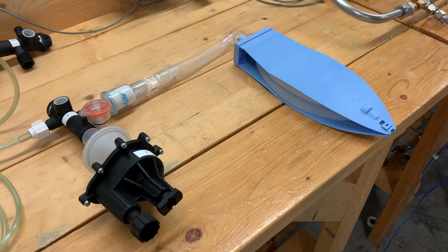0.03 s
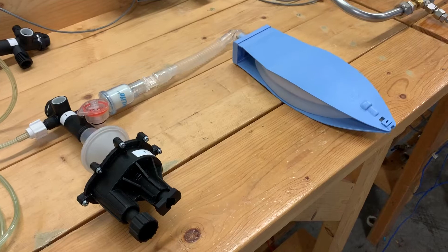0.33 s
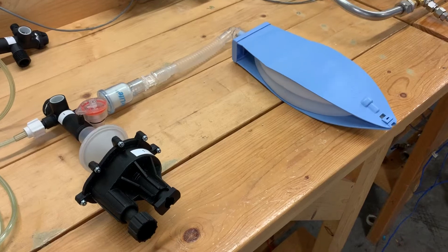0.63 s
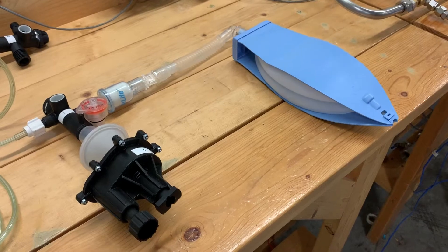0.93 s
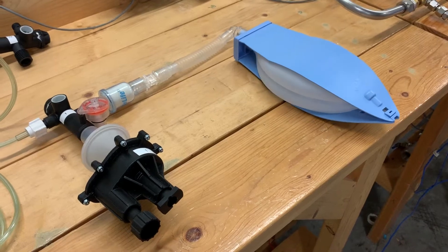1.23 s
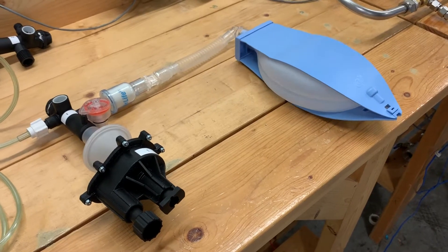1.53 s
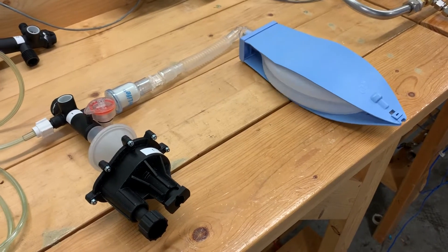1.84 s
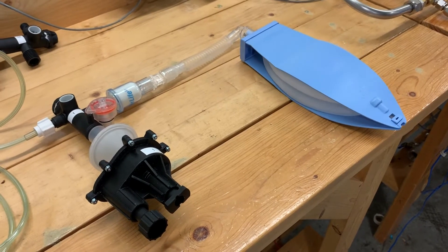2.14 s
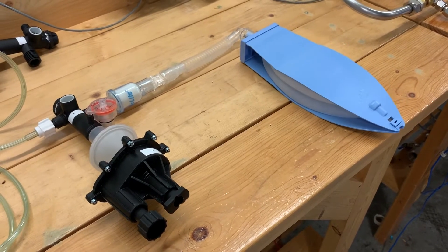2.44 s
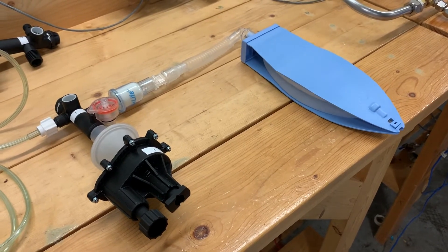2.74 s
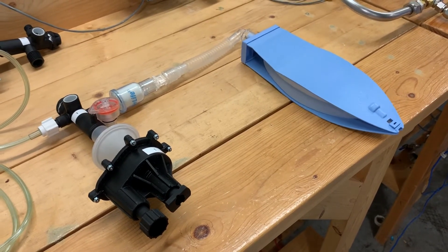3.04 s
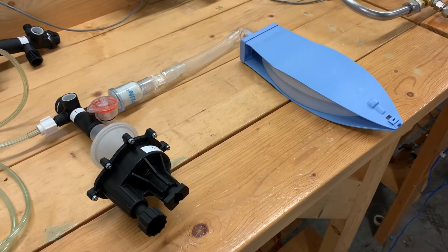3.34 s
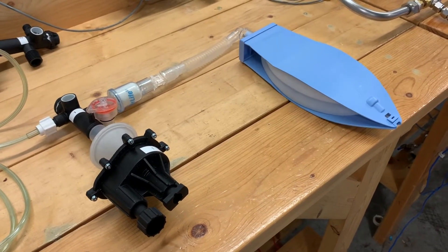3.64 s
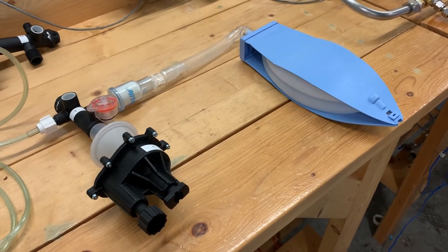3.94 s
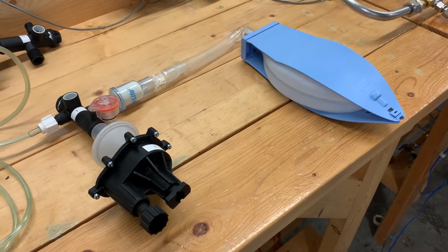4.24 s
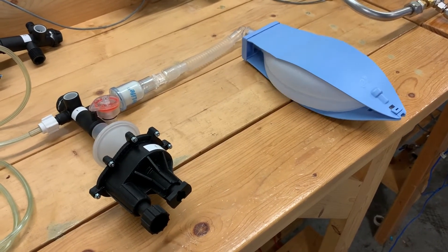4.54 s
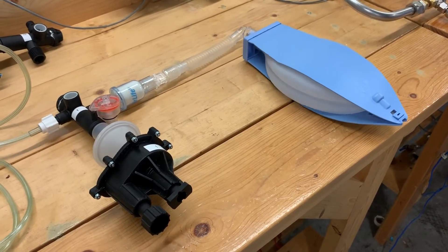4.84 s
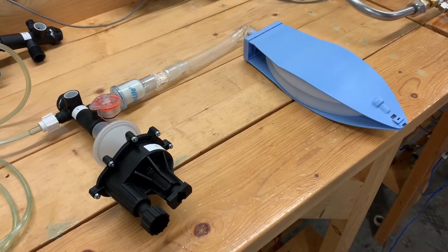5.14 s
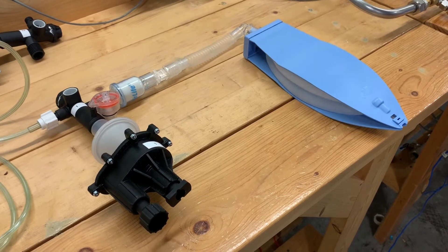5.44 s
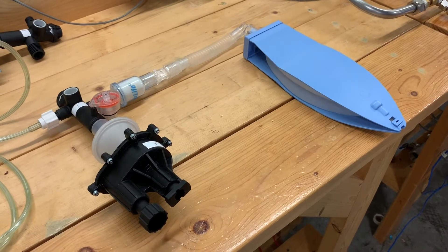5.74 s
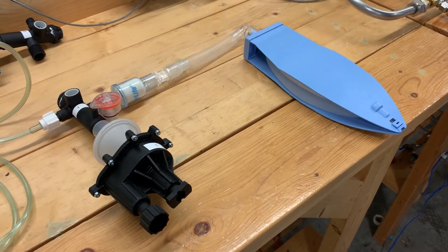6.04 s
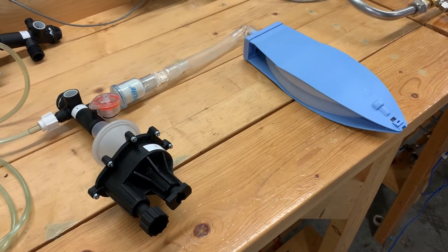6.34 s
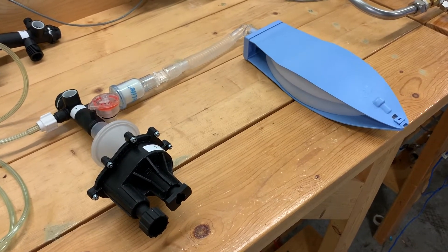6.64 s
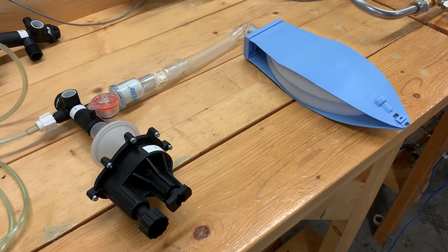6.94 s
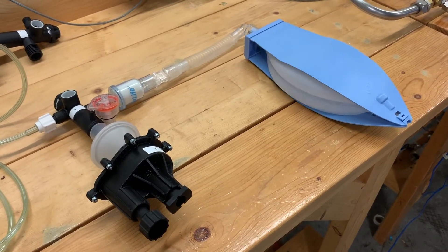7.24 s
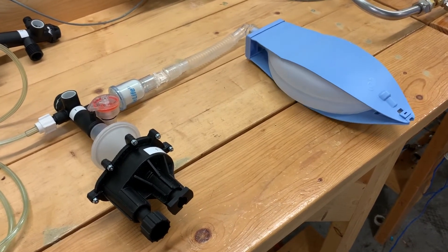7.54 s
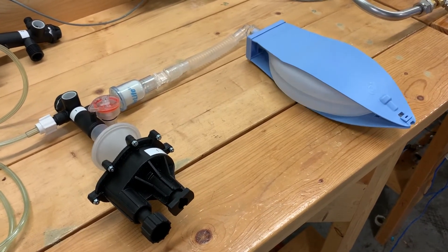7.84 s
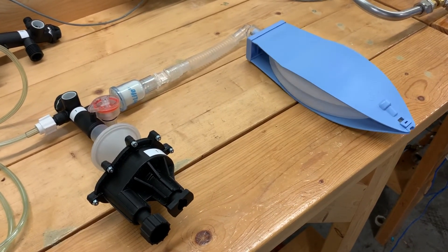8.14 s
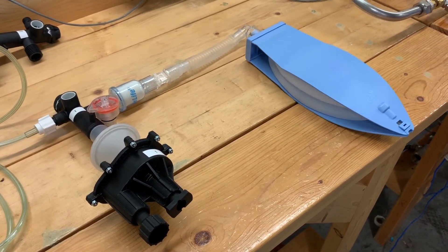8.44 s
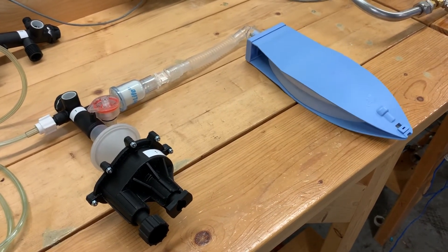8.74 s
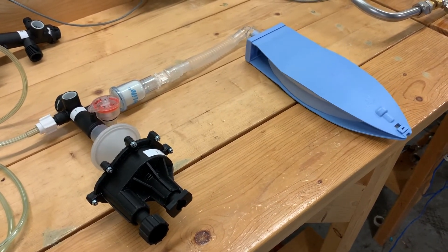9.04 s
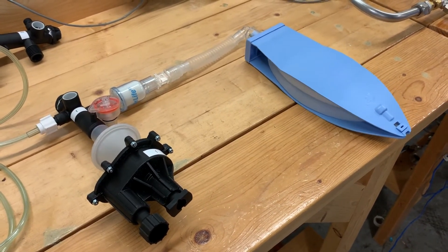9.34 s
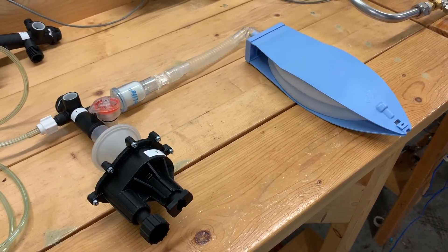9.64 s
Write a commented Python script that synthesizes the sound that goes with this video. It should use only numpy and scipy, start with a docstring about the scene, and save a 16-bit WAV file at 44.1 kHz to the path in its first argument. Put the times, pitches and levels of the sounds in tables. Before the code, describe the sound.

Close up, a bright, constant hiss of gas comes from a ventilator as it inflates and empties a test bag three times. Each cycle starts with a faint filling whistle, followed by a sudden gush of air that sags away into a brief high squeal, a lower chirp and a soft puff as the valve closes. Small clicks are scattered throughout, over the quiet hum and rumble of a workshop.

```python
"""A gas-driven ventilator hisses steadily from its supply jet and cycles a test lung about every 3 s.
The bag fills with a faint whistle; the valve snaps open and vents it in a fading rush that rings the outlet.
As the pressure runs out, the narrowing valve gap squeals, then chirps and seats with a soft puff.
Tiny ticks sound nearby; the workshop hums and rumbles behind."""
import sys
import numpy as np
from scipy import signal
from scipy.fft import rfft, irfft, next_fast_len
from scipy.io import wavfile

SR = 44100
rng = np.random.default_rng(int(sys.argv[2]) if len(sys.argv) > 2 else 0)


def int16_out(signal):
    """Quantize to a 16-bit WAV file."""
    q = np.round(np.clip(np.atleast_2d(signal).T, -1, 1) * 32767)
    wavfile.write(sys.argv[1], SR, q.astype(np.int16))


N = 436149
TIME = np.arange(N) / SR
HZ = np.maximum(np.fft.rfftfreq(next_fast_len(N), 1 / SR), 1)
SIDES = np.array([[1], [-1]])   # left, right
JET_LEAD_S, VENT_LEAD_S = -.000216, .00014   # left ahead of right
JET_RISE_DB = (-4.5, -.87)   # start, end

# breaths: open_s, rush_db, sag_db_per_s, squeal_after_s, squeal_db, chirp_after_s, chirp_db
CYCLES = [(1.675, -1.8, 7.5, 1.04, -34.7, 1.25, -50.2), (4.735, -.1, 5.3, 1.015, -31.5, 1.228, -47.3),
          (7.778, .8, 6.2, 1.05, -29.5, 1.238, -43.8)]
# stereo image of valve and hose: freq_hz, coherence, left_minus_right_db
VENT_IMAGE = [(584, 0.75, 4.5), (1320, 0.52, 5.5), (2370, 0.4, 4), (3470, 0.71, 1), (4320, 1, 1),
              (4800, 0.069, -4), (10000, 0.064, 0)]


def supply_jet():
    """Gas leaves the nozzle steadily, whistles in one band and rings the plastic housing's cavities."""
    # hiss spectrum: freq_hz, density_db
    jet_spectrum = [(1000, -92.5), (1450, -86.3), (1650, -86.5), (1850, -82), (2030, -81.8), (2130, -85),
                    (2380, -84), (2520, -88.5), (2800, -85.5), (3100, -86.5), (3400, -79.3), (3700, -81.5),
                    (4050, -86), (4450, -82.5), (4600, -86), (5300, -80.5), (5600, -78.3), (5780, -79),
                    (6050, -76.8), (6300, -84), (6600, -86.5), (7100, -88), (7700, -89), (8300, -76.5),
                    (9100, -82), (9500, -76.5), (10600, -76.2), (11400, -76), (12000, -72.6),
                    (12500, -69.3), (13600, -68.3), (13950, -71.5), (14600, -68.3), (15050, -74),
                    (15350, -71)]
    # resonances: centre_hz, half_width_hz, density_db
    jet_modes = [(4350, 130, -78.5), (4765, 75, -77), (6420, 90, -82), (8200, 30, -75.5), (8480, 30, -77),
                 (8650, 60, -71.5), (9690, 100, -74), (13000, 160, -69.5), (14200, 110, -68.5)]
    nozzle_modes = [(4985, 75, -68.3), (5115, 105, -68.7), (5250, 65, -69.5), (5475, 65, -75)]
    cavity_modes = [(1730, 45, -89.5), (2230, 90, -85.5), (2690, 70, -86), (3005, 85, -78.2),
                    (3218, 48, -78.7), (3660, 120, -82.3)]
    # stereo images: freq_hz, coherence, left_minus_right_db
    jet_image = [(1000, .5, 4), (1450, .6, 2), (1850, .8, 1), (2250, .05, 2), (3500, .4, 0), (4300, .45, 0),
                 (5100, .6, 0), (5600, .15, 0), (6100, .25, .5), (6400, .75, 0), (6600, .99, 0),
                 (7100, 1, 0), (7700, .99, 0), (8200, .65, 0), (9200, .98, 0), (10500, .7, 0),
                 (11400, .99, 0), (12200, .87, 0), (14000, .97, 0), (15300, .78, 0)]
    nozzle_image = [(4800, .75, -.5), (5100, .98, -.3), (5300, .9, -1), (5480, .6, -6)]
    waver = from_db(.25 * drift(rate_hz=12))
    hiss = turbulence(colour(jet_spectrum, jet_modes), jet_image, JET_LEAD_S)
    nozzle = turbulence(colour(modes=nozzle_modes), nozzle_image, lead_s=0)
    cavities = turbulence(colour(modes=cavity_modes), jet_image, JET_LEAD_S)
    return waver * (level_ramp(*JET_RISE_DB) * (hiss + nozzle) + level_ramp(.5, 0) * cavities)


def venting():
    """The valve snaps open with a gush, the flow sags with bag pressure, a low rush marks the seating."""
    # rush spectrum: freq_hz, density_db
    vent_spectrum = [(300, -93), (700, -80), (1300, -90.5), (2100, -80), (2650, -79), (2900, -91),
                     (3700, -86), (4500, -71.5), (6000, -105), (7000, -102), (8500, -102), (9400, -76),
                     (10400, -80), (11500, -119), (15000, -81)]
    # valve resonances: centre_hz, half_width_hz, density_db
    vent_modes = [(950, 70, -80.5), (1540, 90, -74.5), (1760, 130, -74.3), (2230, 70, -77.2),
                  (2940, 120, -76.5), (3270, 165, -68.9), (3440, 125, -67.1), (3950, 190, -75),
                  (9990, 320, -73.5)]
    seat_modes = [(980, 86, -85), (326, 15, -76)]
    # stereo phase of the rush: freq_hz, left_lead_rad
    vent_phase = [(600, .5), (1210, .8), (1500, 3), (1900, 2.9), (2760, 2.5), (4100, 3.2), (10000, 8.8)]
    trim_db, gush_db, gush_decay_s = -1.6, 3, .07
    seat_after_s, seat_swell_s = 1.35, .57
    flow, seating = 0, 0
    for open_s, rush_db, sag_db_per_s, *_ in CYCLES:
        since_s = np.maximum(TIME - open_s, 0)
        flow_db = trim_db + rush_db + gush_db * np.exp(-since_s / gush_decay_s) - sag_db_per_s * since_s
        flow += from_db(flow_db) * swell(open_s, rise_s=.012, fall_s=.13, hold_s=1.17)
        seating += np.exp(-((TIME - open_s - seat_after_s) / seat_swell_s) ** 2)
    flutter = from_db(drift(rate_hz=16))
    rush = turbulence(colour(vent_spectrum, vent_modes), VENT_IMAGE, lead_of(vent_phase))
    seat_rush = turbulence(colour(modes=seat_modes), VENT_IMAGE, VENT_LEAD_S)
    return flow * flutter * rush + seating * seat_rush


def valve_tones():
    """The narrowing valve gap sings: a high falling squeal, then a short lower chirp."""
    grip = slips()
    squeals = sum(squeal(open_s + after_s, db) for open_s, _, _, after_s, db, _, _ in CYCLES)
    chirps = sum(chirp(open_s + after_s, db) for open_s, *_, after_s, db in CYCLES)
    return (on_bench(grip * squeals, JET_LEAD_S, pan_db=0, echo_db=-17)
            + on_bench(chirps, VENT_LEAD_S, pan_db=9, echo_db=-16))


def squeal(peak_s, level_db):
    """An unsteady whistle locks into a clear tone that sinks with the pressure, then breaks off."""
    top_hz, at_peak_hz, sag_hz_per_s = 10000, 9715, 1200
    fall_s, stop_after_s, break_s = .135, .14, .04
    pitch_hz = np.minimum(top_hz, at_peak_hz - sag_hz_per_s * (TIME - peak_s))
    unsteady = whistle(pitch_hz, level_db - 14.5, jitter_hz=90, rate_hz=200, flutter_db=3)
    unsteady *= swell(peak_s - .08, rise_s=.42, fall_s=fall_s)
    clear = whistle(pitch_hz, level_db, jitter_hz=17, rate_hz=110, flutter_db=1.4)
    clear *= swell(peak_s, rise_s=.15, fall_s=fall_s)
    return (unsteady + clear) * np.interp(TIME - peak_s - stop_after_s, [0, break_s], [1, 0])


def slips(rate_per_s=7, length_s=.016, depth_db=-11):
    """Gain of a squeal that loses its grip for an instant at random."""
    moments = rng.random(N) < rate_per_s / SR
    dips = signal.fftconvolve(moments * 1., np.hanning(int(length_s * SR)), "same")
    return from_db(depth_db * np.minimum(dips, 1))


def chirp(peak_s, level_db):
    """The nearly shut valve hums hoarsely, then jumps to a clear chirp that rises as the gap narrows."""
    hum_hz, chirp_hz, climb_hz_per_s = 2240, 2360, 350
    hum = whistle(hum_hz, level_db - 9.5, jitter_hz=42, rate_hz=200, flutter_db=3)
    hum *= swell(peak_s - .17, rise_s=.085, fall_s=.085)
    pitch_hz = chirp_hz + climb_hz_per_s * (TIME - peak_s)
    clear = whistle(pitch_hz, level_db, jitter_hz=7, rate_hz=150, flutter_db=2.5)
    return hum + clear * swell(peak_s, rise_s=.047, fall_s=.047)


def outlet():
    """Vented gas rings the outlet, lower as the valve closes; once it is shut, a soft puff sinks away."""
    open_hz, shut_hz, ring_db, attack_s, closing_s = 640, 560, -56, .012, 1.1
    puff_after_s, puff_db, puff_hz, sag_hz_per_s = 1.36, -56.2, 495, 400
    centre_hz, flow, puffs = open_hz, 0, 0
    for open_s, rush_db, *_ in CYCLES:
        closure = np.clip((TIME - open_s) / closing_s, 0, 1) ** 3
        centre_hz = np.where(TIME > open_s - attack_s, open_hz + (shut_hz - open_hz) * closure, centre_hz)
        flow += from_db(ring_db + rush_db) * swell(open_s, attack_s, fall_s=.17, hold_s=closing_s)
        puff_s = open_s + puff_after_s
        puff = moving_band(puff_hz - sag_hz_per_s * (TIME - puff_s), half_width_hz=58)
        puffs += puff * swell(puff_s, rise_s=.17, fall_s=.17)
    ring = flow * level_ramp(*JET_RISE_DB) * moving_band(centre_hz, half_width_hz=90)
    return on_bench(ring + from_db(puff_db) * puffs, VENT_LEAD_S, pan_db=3.5, echo_db=-12)


def filling():
    """The hose always rushes hollowly; as the bag fills, the rush grows and a thin whistle sinks."""
    # hose resonance: centre_hz, half_width_hz, density_db
    hose_modes = [(1208, 74, -79)]
    idle_db, fill_db = 1.5, -5.5
    whistle_db, start_hz, sag_hz_per_s2, before_open_s = -54.7, 3255, 560, .78
    tones, flow = 0, from_db(idle_db) * level_ramp(*JET_RISE_DB)
    for open_s, rush_db, *_ in CYCLES:
        peak_s = open_s - before_open_s
        pitch_hz = start_hz - sag_hz_per_s2 * np.clip(TIME - peak_s, 0, before_open_s) ** 2
        tone = whistle(pitch_hz, whistle_db + rush_db, jitter_hz=26, rate_hz=130, flutter_db=2.4)
        tones += tone * swell(peak_s, rise_s=.12, fall_s=.24, hold_s=.22)
        flow += from_db(fill_db + rush_db) * swell(open_s, rise_s=.52, fall_s=.28)
    hose = flow * turbulence(colour(modes=hose_modes), VENT_IMAGE, VENT_LEAD_S)
    return hose + on_bench(tones, lead_s=0, pan_db=1.2, echo_db=-8)


def ticks():
    """Tiny close clicks, plus fainter random ones, ring the same damped modes of alternating sign."""
    # clicks: start_s, level_db
    tick_events = [(2.62, -35), (3.002, -36), (4.006, -36), (4.912, -35), (5.495, -34), (6.258, -32),
                   (6.797, -30), (7.356, -30), (7.654, -30), (7.686, -35), (7.999, -32), (8.14, -33),
                   (8.295, -33)]
    # their ring: pitch_hz, t60_s, left_db, right_db
    tick_modes = [(270, .02, -11, -15), (530, .012, -6, -5), (1200, .0035, -5, 3), (2300, .0015, -13, 1.5)]
    faint_from_s, faint_to_s, faint_per_s, faint_db, spread_db = 3.6, 9.7, 5, -39.5, 2
    start_s, level_db = np.transpose(tick_events)
    clicks, out = np.zeros(N), np.zeros((2, N))
    clicks[np.round(start_s * SR).astype(int)] = from_db(level_db)
    faint = (rng.random(N) < faint_per_s / SR) & (TIME > faint_from_s) & (TIME < faint_to_s)
    clicks += faint * from_db(faint_db + spread_db * rng.standard_normal(N))
    for k, (pitch_hz, t60_s, left_db, right_db) in enumerate(tick_modes):
        radius, angle = from_db(-60 / (t60_s * SR)), 2 * np.pi * pitch_hz / SR
        poles = [1, -2 * radius * np.cos(angle), radius ** 2]
        ring = signal.lfilter([0, np.sin(angle)], poles, clicks + 1e-18)
        out += (-1) ** k * from_db([[left_db], [right_db]]) * ring
    return out


def workshop():
    """Restless room noise and steady machine hums; rumble and low drones come and go."""
    # noise spectra: freq_hz, density_db
    room_spectrum = [(20, -103), (32, -100), (50, -67), (90, -74), (160, -73.5), (260, -80.5), (400, -78.5),
                     (650, -77.5), (820, -83.5), (1000, -79), (1500, -101.5), (3000, -105)]
    rumble_spectrum = [(15, -105), (32, -103), (48, -58.5), (70, -62), (100, -59), (160, -100.5)]
    # room resonances: centre_hz, half_width_hz, density_db
    room_modes = [(125.7, 16, -66), (210, 36, -69.5), (309.5, 28, -75.5), (568.4, 4.9, -74.5)]
    # stereo images: freq_hz, coherence, left_minus_right_db
    room_image = [(50, 0.8, 1), (131, 0.86, 0), (256, 0.9, 1), (660, 0.14, 4.5), (1220, 0.55, 3)]
    rumble_image = [(45, .7, 0), (80, .6, -1)]
    # stereo phase of the room: freq_hz, left_lead_rad
    room_phase = [(80, 2), (120, 1.35), (210, 1.1), (500, .4)]
    # rumble swells: peak_s, level_db, span_s
    rumble_swells = [(.8, -11, 1), (3.4, -9, 1.0), (5.9, -16.5, 0.65), (9.6, -11, 0.07)]
    # drones: peak_s, level_db, span_s, pitch_hz
    drone_swells = [(1.0, -49, 0.9, 75.6), (2.7, -54, 1.0, 45), (9.6, -62, .12, 45)]
    # machines: pitch_hz, level_db
    machine_hums = [(210, -56.5), (285.6, -62)]
    room_gain = level_ramp(start_db=-9, end_db=-5.5)
    room = room_gain * turbulence(colour(room_spectrum, room_modes), room_image, lead_of(room_phase))
    rumble = turbulence(colour(rumble_spectrum), rumble_image, lead_s=.00024)
    rumble *= sum(from_db(db) * swell(peak_s, span_s, span_s) for peak_s, db, span_s in rumble_swells)
    drones = sum(swell(peak_s, span_s, span_s) * whistle(hz, db, jitter_hz=.61, rate_hz=4, flutter_db=.5)
                 for peak_s, db, span_s, hz in drone_swells)
    hums = sum(whistle(hz, db, jitter_hz=.95, rate_hz=4.8, flutter_db=1.5) for hz, db in machine_hums)
    unrest = from_db(2 * drift(rate_hz=30))
    return unrest * (room + rumble) + to_stereo(drones + np.sqrt(room_gain) * hums, lead_s=.00058)


def from_db(db):
    """Decibels to gain."""
    return 10 ** (np.asarray(db) / 20)


def swell(peak_s, rise_s, fall_s, hold_s=0):
    """Bell envelope: up to 1 at peak_s, held, then down."""
    before_s, after_s = np.minimum(TIME - peak_s, 0), np.maximum(TIME - peak_s - hold_s, 0)
    return np.exp(-np.minimum((before_s / rise_s) ** 2 + (after_s / fall_s) ** 2, 20))


def level_ramp(start_db, end_db, from_s=1.7, to_s=5.9):
    """Gain that moves slowly from a start level to an end level, then holds."""
    return from_db(np.interp(TIME, [from_s, to_s], [start_db, end_db]))


def per_bin(rows):
    """Table columns interpolated over log frequency onto HZ."""
    freq_hz, *columns = np.transpose(rows)
    return [np.interp(np.log(HZ), np.log(freq_hz), column) for column in columns]


def lead_of(phases):
    """Phase table to left lead in seconds per bin."""
    return per_bin(phases)[0] / (2 * np.pi * HZ)


def white():
    """Spectrum of fresh white noise, 0 dB per Hz."""
    return rfft(rng.standard_normal(next_fast_len(N))) * np.sqrt(SR / 2)


def drift(rate_hz):
    """Unit-variance noise, low-passed at rate_hz."""
    slow = irfft(white() / (1 + (HZ / rate_hz) ** 2))[:N]
    return slow / slow.std()


def colour(spectrum=None, modes=()):
    """Gain per bin of a broad spectrum plus resonances, summed in power."""
    power = from_db(per_bin(spectrum)[0]) ** 2 if spectrum else 0
    for centre_hz, half_width_hz, db in modes:
        power += (from_db(db) / (1 + ((HZ - centre_hz) / half_width_hz) ** 2)) ** 2
    return np.sqrt(power)


def turbulence(gain, image, lead_s):
    """Stereo noise: a direct part, lead_s earlier on the left, plus unrelated reflections."""
    coherence, pan_db = per_bin(image)
    coherence = np.clip(coherence, 0, 1)
    direct = np.sqrt(coherence) * white() * np.exp(SIDES * 1j * np.pi * HZ * lead_s)
    reflections = np.sqrt(1 - coherence) * np.array([white(), white()])
    return irfft(gain * (direct + reflections) * from_db(SIDES * pan_db / 2))[:, :N]


def moving_band(centre_hz, half_width_hz):
    """Unit-rms noise in a resonance whose centre moves."""
    phase = 2 * np.pi * np.cumsum(centre_hz) / SR
    return drift(half_width_hz) * np.cos(phase) + drift(half_width_hz) * np.sin(phase)


def whistle(pitch_hz, level_db, jitter_hz, rate_hz, flutter_db):
    """Tone whose pitch and level shake at random."""
    phase = 2 * np.pi * np.cumsum(pitch_hz + jitter_hz * drift(rate_hz)) / SR
    return np.sqrt(2) * from_db(level_db + flutter_db * drift(rate_hz / 2)) * np.sin(phase)


def to_stereo(x, lead_s):
    """Mono to stereo, lead_s earlier on the left."""
    return irfft(rfft(x, next_fast_len(N)) * np.exp(SIDES * 1j * np.pi * HZ * lead_s))[:, :N]


def on_bench(x, lead_s, pan_db, echo_db, t60_s=.14):
    """Direct sound plus a short scatter from bench and walls."""
    t = TIME[:SR // 4]
    scatter = rng.standard_normal((2, len(t))) * from_db(-60 * t / t60_s)
    scatter /= np.linalg.norm(scatter, axis=1, keepdims=True)
    echoes = signal.fftconvolve(x[None], scatter, axes=1)[:, :N]
    return (to_stereo(x, lead_s) + from_db(echo_db) * echoes) * from_db(SIDES * pan_db / 2)


def scene():
    """The ventilator in its room."""
    return supply_jet() + filling() + venting() + outlet() + valve_tones() + ticks() + workshop()


def record(dry):
    """Brief opening silence; steep low-pass."""
    start_s, cutoff_hz = .12, 15450
    lowpass = signal.ellip(12, .1, 80, cutoff_hz, fs=SR, output="sos")
    return signal.sosfilt(lowpass, dry * (TIME >= start_s))


dry = scene()
out = record(dry)
int16_out(out)
```